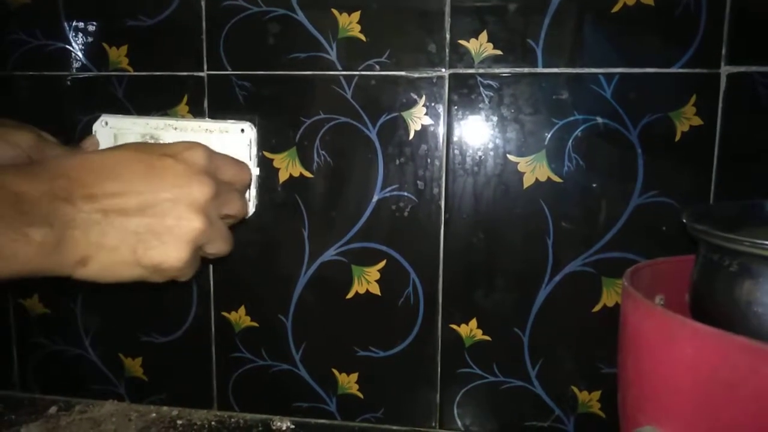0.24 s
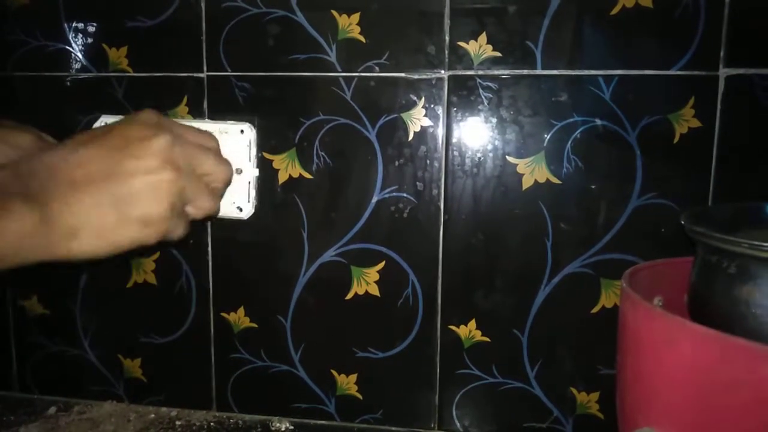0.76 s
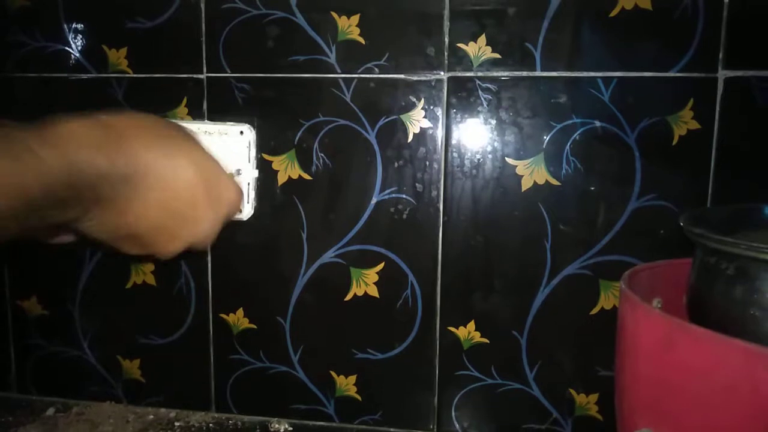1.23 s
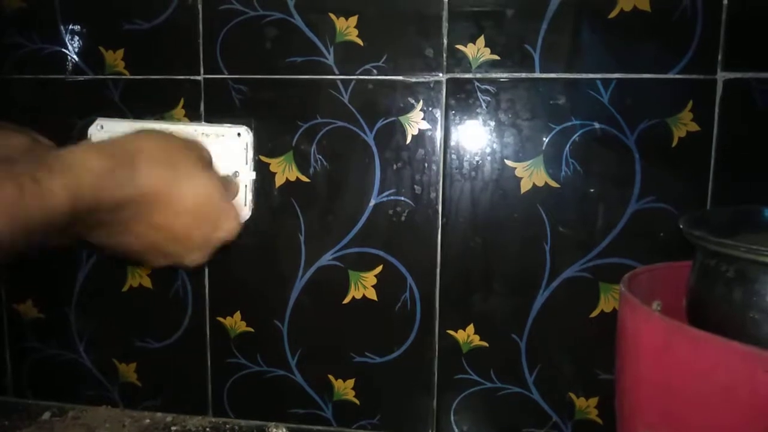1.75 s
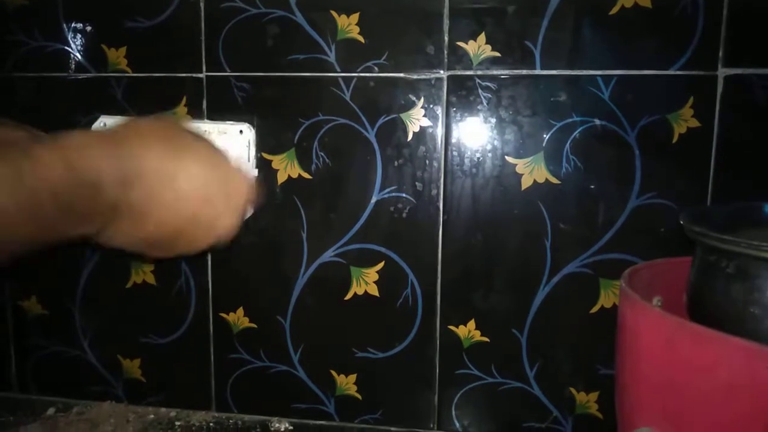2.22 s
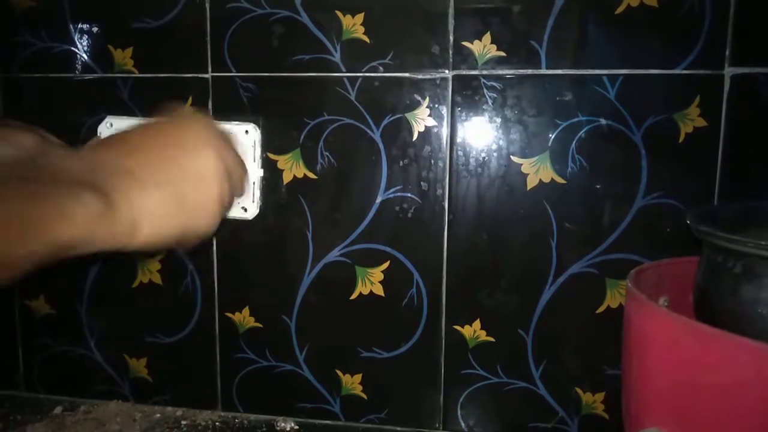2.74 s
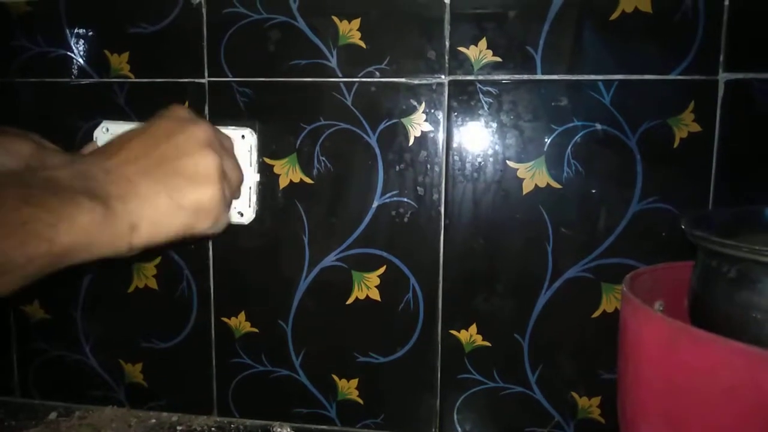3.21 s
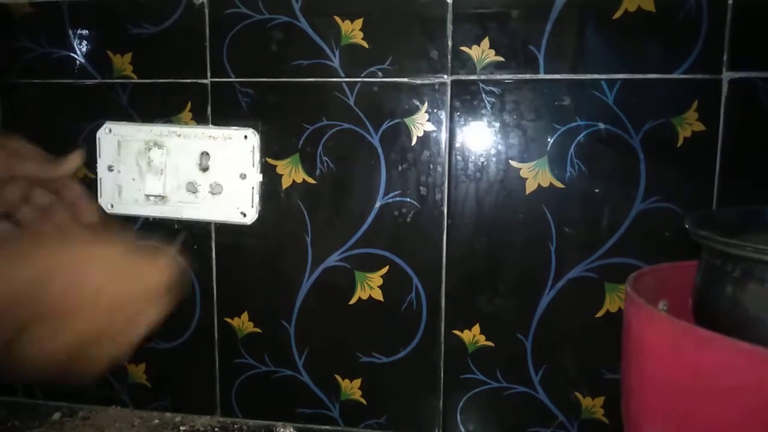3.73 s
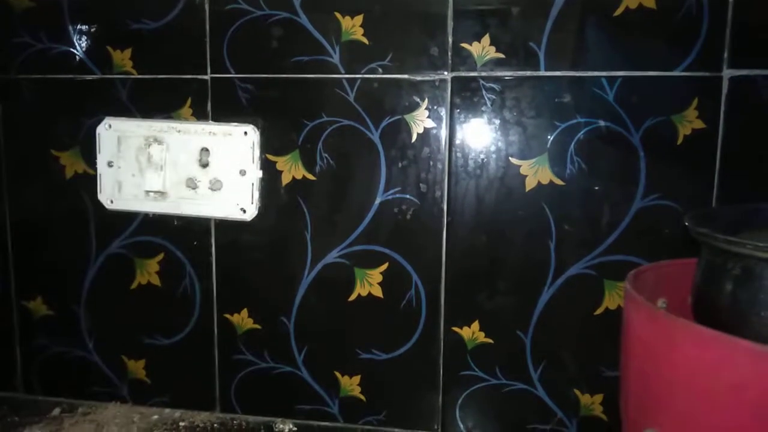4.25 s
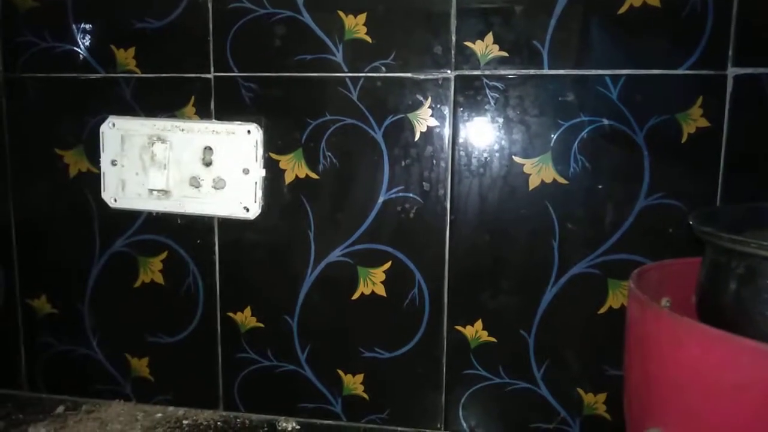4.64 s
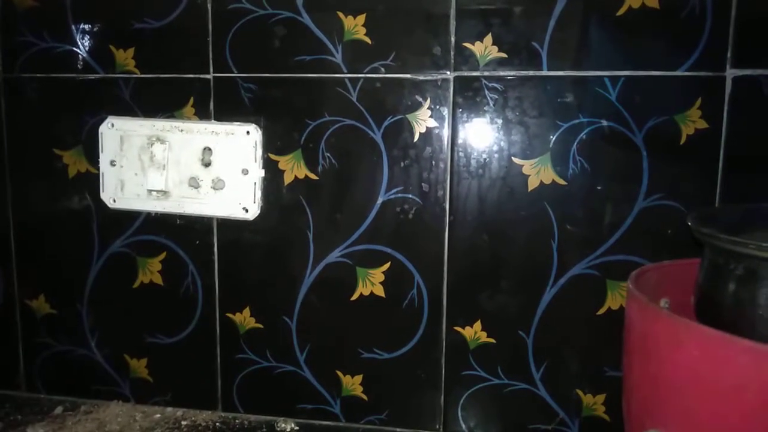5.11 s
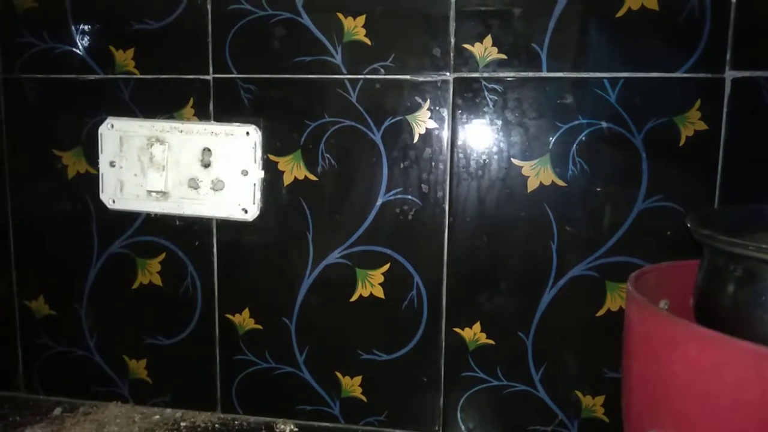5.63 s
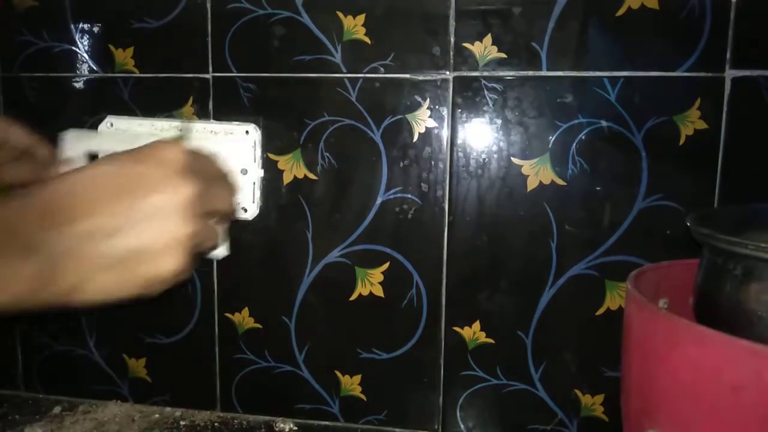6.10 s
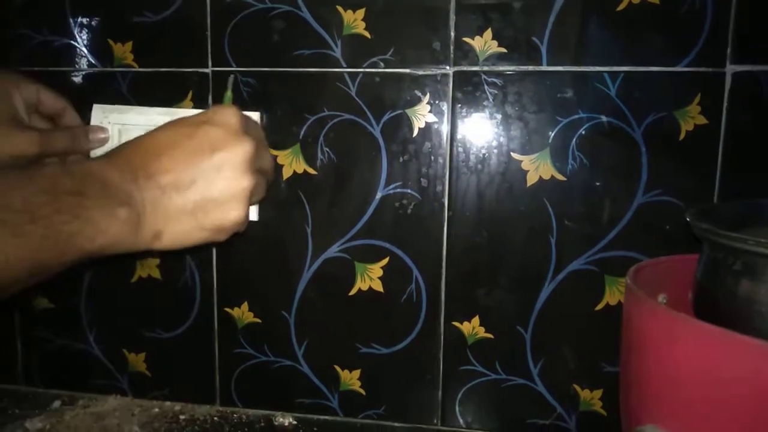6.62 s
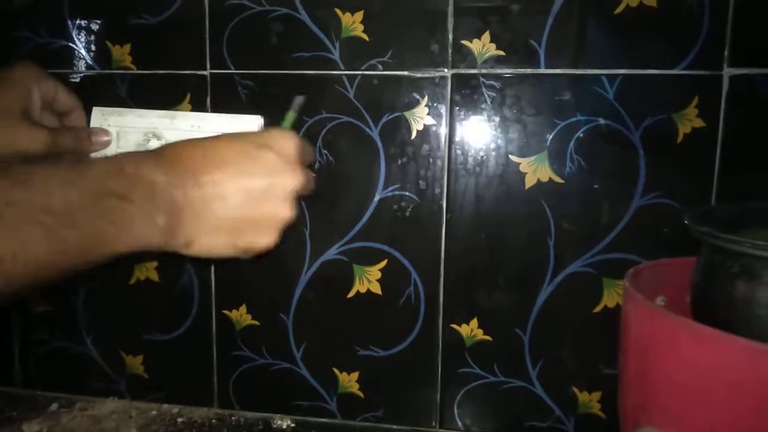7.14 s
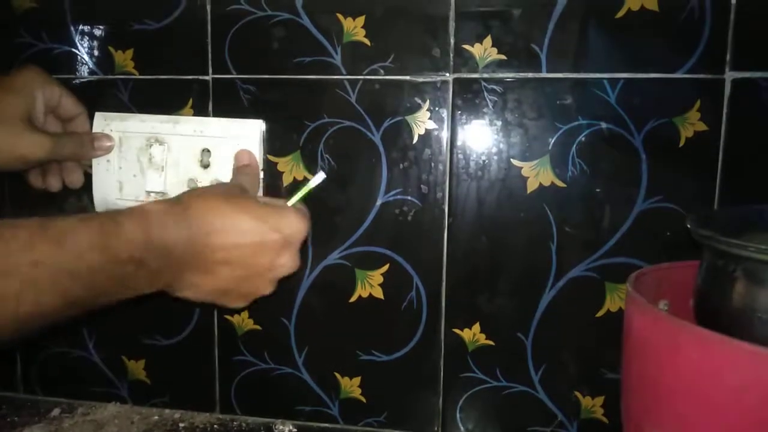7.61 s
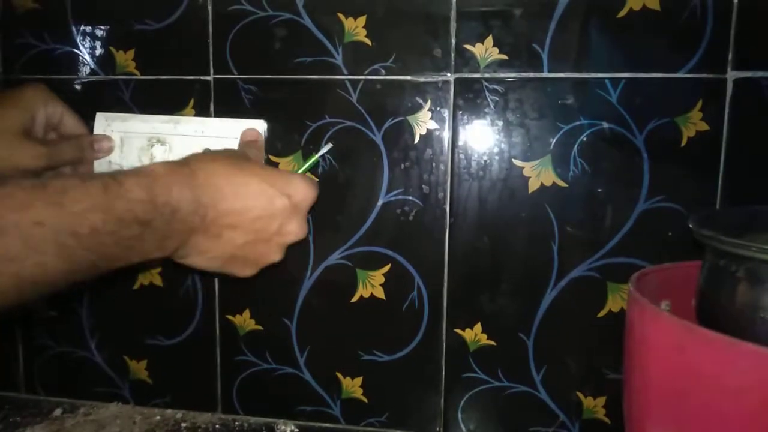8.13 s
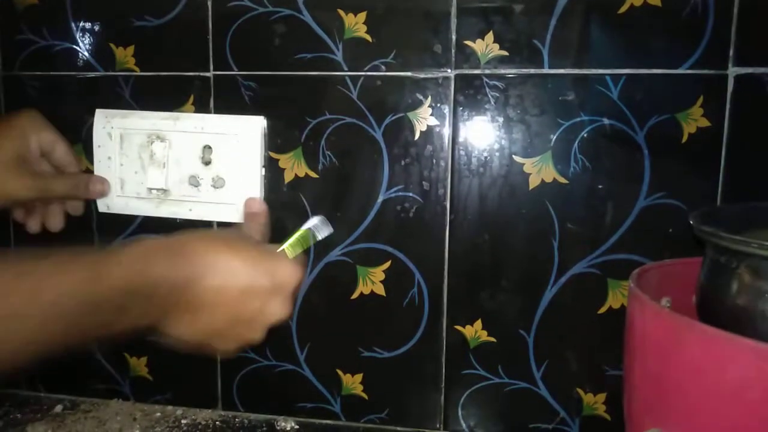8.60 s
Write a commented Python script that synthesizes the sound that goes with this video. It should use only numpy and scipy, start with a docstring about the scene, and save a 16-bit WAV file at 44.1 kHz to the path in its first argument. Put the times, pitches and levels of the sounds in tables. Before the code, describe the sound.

In a quiet tiled kitchen with a faint wavering hum, fingers tick and rub on plastic and click a wall switch on and off, close by. A light clink and two hard knocks come from things on the counter. A loose plastic cover then rattles softly, seats with a loud snap and gives several smaller snaps as its catches lock, while a faint deep rumble rises near the end.

```python
"""A tiled kitchen, hands at work on a plastic wall switch. The rocker flips with a dull crack over its
hollow box, fingers tick and rub, things knock on the counter, then the cover plate is pressed on and
snaps into place. Each click is a burst of short, crowded modes, brighter for a harder contact, and the
tiles throw it back. Underneath lie still air, a wavering hum and, near the end, a deep rumble."""
import sys
import numpy as np
from scipy import signal
from scipy.fft import rfft, irfft
from scipy.io import wavfile
from scipy.ndimage import uniform_filter1d

SR = 44100
rng = np.random.default_rng(int(sys.argv[2]) if len(sys.argv) > 2 else 0)


def generate_wav(sig):
    """Save sig (samples, or channels by samples) to the path in sys.argv[1] as 16-bit PCM at SR."""
    pcm = np.round(np.clip(np.atleast_2d(sig).T, -1, 1) * 32767).astype(np.int16)
    wavfile.write(sys.argv[1], SR, pcm)


N = 390725


def amp(db):
    """Decibels to gain."""
    return 10 ** (np.asarray(db) / 20)


def unit_rms(x):
    """Scales to rms 1."""
    return x / np.sqrt(np.mean(x ** 2) + 1e-20)


def curve(points, hz):
    """Reads (f/Hz, value) points on a log-frequency axis."""
    f, value = np.transpose(points)
    return np.interp(np.log(hz + 1), np.log(f + 1), value)


def peaks(resonances, hz):
    """Gain in dB of resonances given as (f/Hz, width/Hz, gain/dB)."""
    return sum(db / (1 + (2 * (hz - f) / width) ** 2) for f, width, db in resonances)


def add(mix, s, sound):
    """Mixes a sound in at s seconds."""
    part = mix[..., round(s * SR):][..., :sound.shape[-1]]
    part += sound[..., :part.shape[-1]]


def eq(x, points):
    """Filters by a curve of (f/Hz, gain/dB)."""
    return irfft(rfft(x) * amp(curve(points, np.fft.rfftfreq(len(x), 1 / SR))), len(x))


def minimum_phase(db):
    """The filter with this gain that rings only after the blow."""
    log_gain = np.log(amp(np.concatenate([db, db[-2:0:-1]])))
    return np.exp(np.conj(signal.hilbert(log_gain)))[:len(db)]


def drift(rate_hz):
    """Smooth random modulation of rms 1."""
    lowpass = np.exp(-(np.fft.rfftfreq(N, 1 / SR) / rate_hz) ** 2)
    return unit_rms(irfft(rfft(rng.standard_normal(N)) * lowpass, N))


# Room tone EQ: f/Hz, gain/dB
AIR_EQ = [(12, -30), (20, 8.5), (65, -13.5), (88, -2), (113, -8.5), (146, -14.5), (163, -24.5), (177, -23),
          (262, -27.5), (301, -18), (446, -31), (624, -27), (1060, -30.5), (1150, -31), (1480, -30.5),
          (2140, -32), (2670, -35), (2910, -37.5), (16000, -39)]
def air(level_db=-60.5):
    """Still air: a steady bed of dark noise."""
    return amp(level_db) * unit_rms(eq(rng.standard_normal(N), AIR_EQ))


# Swells of the hum: t/s, lift/dB
HUM_SWELLS = [(.41, 3), (.77, 8.5), (1.49, 9), (2.21, 3), (2.93, 7), (3.29, 11), (3.65, 7.5), (4.73, 11.5),
              (6.17, 4), (8.33, 6)]
def hum(pitch_hz=143.3, level_db=-68, waver_hz=3.5, flutter=0.56, swell_s=0.076):
    """A low sine that wavers in pitch, flutters and swells now and then."""
    t = np.arange(N) / SR
    cycles = np.cumsum(pitch_hz + waver_hz * drift(7.46)) / SR
    swell_db = sum(db * np.exp(-((t - s) / swell_s) ** 2) for s, db in HUM_SWELLS)
    level = amp(level_db + swell_db) * (1 + flutter * drift(19))
    return level * unit_rms(np.sin(2 * np.pi * cycles))


# Fader ride of the rumble: t/s, level/dB
RUMBLE_RIDE = [(0, -70.5), (7.401, -75), (7.9, -56.5), (8.86, -57.5)]
def rumble():
    """Sub-bass noise that grows near the end."""
    low = eq(rng.standard_normal(N), [(15, -29), (35, 9.5), (52, 0), (90, -26), (300, -67.5)])
    return unit_rms(low) * amp(np.interp(np.arange(N) / SR, *np.transpose(RUMBLE_RIDE)))


# Reverb decay: f/Hz, t60/s
TILE_DECAY = [(150, 0.25), (600, 0.66), (1500, 0.52), (3500, 0.57), (6500, 0.57), (15000, 0.29)]
# Reverb EQ: f/Hz, gain/dB
TILE_EQ = [(150, 7.5), (700, 8), (1400, 3.5), (3000, 1), (6300, -4.5), (10000, -2), (15000, 3.5)]
def tile_reverb(send, build_s=0.0039):
    """Dense reflections build up, then each band dies at its own speed."""
    hz, t, bands = signal.stft(rng.standard_normal(SR), SR, nperseg=256)
    decay = amp(-60 * t / curve(TILE_DECAY, hz)[:, None])
    tail = signal.istft(bands * decay * (1 - np.exp(-t / build_s)), SR, nperseg=256)[1]
    return signal.fftconvolve(send, eq(tail / np.linalg.norm(tail), TILE_EQ))[:N]


# Fingers sliding over plastic: t/s, length/s, level/dB
STROKES = [(0.311, 0.011, -60), (0.652, 0.0035, -41), (1.102, 0.12, -64), (1.312, 0.033, -66),
           (1.543, 0.14, -60), (1.994, 0.13, -61.5), (2.445, 0.1, -59.5), (2.857, 0.12, -60),
           (3.257, 0.12, -68.5), (3.545, 0.024, -58.5), (4.188, 0.021, -49.5), (4.209, .1, -59.5),
           (5.152, 0.065, -62.5), (5.207, 0.078, -64), (5.587, 0.091, -57.5), (6.5, 0.1, -66),
           (6.879, 0.014, -45), (7.418, 0.0073, -49), (8.55, 0.021, -50)]
# Friction EQ: f/Hz, gain/dB
RUB_EQ = [(180, -32), (300, -19.5), (398, -6), (565, -10.5), (1190, -22.5), (1340, -7), (1780, -8.5),
          (2700, -9.5), (3030, -10.5), (4370, -12.5), (6200, -1), (8360, -20.5), (16000, -11.5)]
# Resonances that rubbing picks out: f/Hz, width/Hz, gain/dB
SQUEAK_MODES = [(2737, 130, 11.5), (6200, 500, 2), (2100, 680, 1.5)]
def finger_rubs(grain_db=3.0, slips_hz=260):
    """Skin sticks and slips: grainy, faintly squeaky hiss under each stroke."""
    hz = np.fft.rfftfreq(N, 1 / SR)
    slips = rng.standard_normal(N) * amp(grain_db * drift(slips_hz))
    pressure = np.zeros(N)
    for s, length, db in STROKES:
        add(pressure, s, amp(db) * np.sqrt(np.hanning(round(length * SR))))
    colour = amp(curve(RUB_EQ, hz) + peaks(SQUEAK_MODES, hz))
    return pressure * unit_rms(irfft(rfft(slips) * colour, N))


def crowded_modes(t, t60, rise_s=0.00074, spike_db=5, spike_t60=0.0053):
    """Spectrum of a hard little body's short modes: a noise burst with a sharp transient on top."""
    envelope = (1 - np.exp(-t / rise_s)) * (amp(-60 * t / t60) + amp(spike_db - 60 * t / spike_t60))
    modes = rfft(envelope * rng.standard_normal(len(t)))
    return modes / np.sqrt(uniform_filter1d(abs(modes) ** 2, size=70))  # the blow feeds all bands evenly


# Centres of a click's thud, mid, bite, snap and fizz bands: f/Hz
CLICK_BANDS = [520, 1400, 3200, 6000, 14000]
# Lift of bite, snap and fizz with hardness: slope/(dB per dB)
HARDNESS_LIFT = [0.42, 0.98, 1.02]
# Colour that the tiled corner and the microphone give every click: f/Hz, gain/dB
CLICK_EQ = [(60, -14.5), (150, -11), (255, -12), (340, -5), (480, -5.5), (590, -7), (760, -4.5), (1400, 0),
            (4200, -4.5), (5300, 0), (6400, 8.5), (7100, 0.5), (7800, -5.5), (11000, -12), (13500, -5.5),
            (15600, 3.5)]
def strike(body, db, thud_db, hard_db, treble_db, contact_hz, t60, send_db, contact_db=8, size=8192):
    """One blow, as (direct, reverb send); hardness lifts treble_db: bite, snap and fizz over the mid."""
    t, hz = np.arange(size) / SR, np.fft.rfftfreq(size, 1 / SR)
    modes = crowded_modes(t, t60)
    bands_db = [thud_db, 0, *(np.array(treble_db) + hard_db * np.array(HARDNESS_LIFT))]
    shape_db = db + curve(list(zip(CLICK_BANDS, bands_db)), hz) + curve(CLICK_EQ, hz)
    contact = [(contact_hz[0], 75, contact_db), (contact_hz[1], 75, 6)]
    ring_db = np.maximum(peaks(body, hz), peaks(contact, hz))
    # each blow wakes some modes more than others
    ring_db += 2 * unit_rms(uniform_filter1d(rng.standard_normal(len(hz)), size=14))
    predelay = np.exp(-2j * np.pi * hz * 0.004)  # 4 ms until the first surface answers
    click = irfft(modes * minimum_phase(shape_db + ring_db))
    pulse = irfft(predelay * minimum_phase(shape_db + ring_db / 2))
    fade = np.minimum(1, 2 - 2 * t / t[-1]) ** 2
    return np.array([click, amp(send_db) * pulse]) * fade


def ring(hz, db, spread_hz, t60, rise_s=0.0047, count=64):
    """A ringing note: a cluster of close modes that beat as they die."""
    t = np.arange(SR * 2 // 3) / SR
    detune, phase = rng.standard_normal((count, 1)), rng.random((count, 1))
    cluster = np.sin(2 * np.pi * ((hz + spread_hz * detune) * t + phase)).sum(0)
    envelope = amp(-60 * t / t60) * (1 - np.exp(-t / rise_s))
    return amp(db) * envelope * cluster / np.sqrt(np.average(cluster ** 2, weights=envelope ** 2))


# Resonances of the things on the counter: f/Hz, width/Hz, gain/dB
WARE_MODES = [(476, 9.2, 9), (940, 57, 5.5), (1044, 58, 2.5), (1603, 65, -5), (2154, 190, 11.5),
              (3270, 29, -7), (5620, 100, 6.5), (6930, 90, -1)]
# Hits on the counter: t/s, level/dB, thud/dB, bite/dB, hardness/dB, contact f/Hz, t60/s, send/dB
COUNTER_HITS = [(4.2015, -13.5, -9, 14, 6, 2430, 0.067, -18), (4.208, -14.5, -5, 15.5, 5, 2450, 0.042, -23),
                (4.46, -39.5, 0, -5, 5.5, 5860, 0.051, 3.5), (5.011, -38.5, -5, 5.5, 6, 2000, 0.037, -17),
                (5.3604, 11.5, -12, -4.5, -9.5, 1840, 0.029, -17),
                (5.376, 1.5, 3, 1.5, -5.5, 2080, 0.062, -14),
                (5.6186, -3.5, -12, -4, 7, 5600, 0.025, -15.5), (5.621, 0.5, 6, -1.5, 7, 5860, 0.044, -11)]
# Ring-out of thin ware: t/s, f/Hz, level/dB
WARE_CLINKS = [(4.205, 2390, -58.5), (5.364, 1926, -47.5)]
# Low end under the heavy hits: t/s, level/dB
COUNTER_BOOMS = [(5.363, -39), (5.623, -41.5)]
def counter(boom_hz=141):
    """Things knock on the counter; thin ware rings on, and the counter booms under the heavy ones."""
    out = np.zeros((2, N))
    for s, db, thud_db, bite_db, hard_db, hz, t60, send_db in COUNTER_HITS:
        add(out, s, strike(WARE_MODES, db, thud_db, hard_db, treble_db=[bite_db, -3.5, -6],
                           contact_hz=[hz, 1620], t60=t60, send_db=send_db))
    for s, hz, db in WARE_CLINKS:
        add(out[0], s, ring(hz, db, spread_hz=210, t60=0.55))
    for s, db in COUNTER_BOOMS:
        add(out[0], s, ring(boom_hz, db, spread_hz=0.86, t60=0.54, rise_s=0.0091))
    return out


# The plate over its hollow box, the body of every switch click: f/Hz, width/Hz, gain/dB
PLATE_MODES = [(331, 54, 4), (449, 39, 8), (784.4, 24, 12.5), (970, 22, 8.5), (1450, 61, 7.5),
               (1602, 51, 5.5), (1974, 33, 8), (2508, 150, 5.5), (2710, 62, 7.5), (4000, 67, 2),
               (4670, 140, 3), (5950, 130, 4), (6040, 200, 1)]
# Finger ticks: t/s, level/dB, hardness/dB, contact f/Hz
FINGER_TICKS = [(1.082, -32, -5, 2770), (1.113, -22, -3, 2770), (1.469, -30, -1, 1590),
                (1.585, -30, -6, 2750), (1.625, -27, -9, 2840), (1.777, -29, -7, 750),
                (1.809, -40, 12.5, 6260), (1.938, -28.5, -3, 1050), (2.348, -36, 2.5, 2220),
                (2.786, -37.5, 4, 1470), (2.8, -23.5, -14, 1370), (3.301, -25, -3, 1420),
                (3.553, -38, 6, 5070), (6.259, -33, 0.5, 1620), (6.8467, -33.5, 6.5, 6400),
                (7.5716, -46, 6, 938), (8.3207, -37, 9, 2730)]
def fingertips(thud_db=-3):
    """Fingertips and nails tick on the plastic, too lightly to wake the box."""
    out = np.zeros((2, N))
    for s, db, hard_db, hz in FINGER_TICKS:
        add(out, s, strike(PLATE_MODES, db, thud_db, hard_db, treble_db=[0.5, -6.5, -3],
                           contact_hz=[hz, 2760], t60=0.066, send_db=-6, contact_db=13))
    return out


# Bumps of the cover: t/s, level/dB, thud/dB, hardness/dB, hollow note level/dB
COVER_BUMPS = [(6.379, -27.5, 14, 4, -66), (6.391, -17, 4.5, 2, -45), (6.424, -22, 1, -4.5, -42.5),
               (6.557, -23, 14, 8.5, -54), (6.562, -17.5, 13.5, -7, -44), (6.638, -16, 16.5, -1.5, -43),
               (6.667, -14, 9.5, 8, -40), (6.6881, -9, 10, -4.5, -37.5), (6.776, -24.5, 3.5, -21, -55),
               (8.037, -25, 16, -11, -74), (8.803, -32.5, 19, -15, -56)]
def cover_pushes(box_hz=760):
    """The loose cover bumps on the box, which answers with a short hollow note."""
    out = np.zeros((2, N))
    for s, db, thud_db, hard_db, note_db in COVER_BUMPS:
        add(out, s, strike(PLATE_MODES, db, thud_db, hard_db, treble_db=[3.5, -4, -9],
                           contact_hz=[770, 1560], t60=0.046, send_db=-15.5))
        add(out[0], s, ring(box_hz, note_db, spread_hz=42, t60=0.1, rise_s=0.0064))
    return out


def cover_seating(meet_s=6.885, seat_s=6.911, thump_hz=36, thump_db=-33, thump_t60=0.11):
    """The cover knocks against the wall, then drops home with one heavy, quickly damped swing."""
    out, t = np.zeros(N), np.arange(SR // 2) / SR
    add(out, meet_s, ring(hz=390, db=-34, spread_hz=160, t60=0.04, rise_s=0.003))
    add(out, seat_s, amp(thump_db - 60 * t / thump_t60) * np.sin(2 * np.pi * thump_hz * t))
    return out


# Flips: t/s, level/dB, thud/dB, hardness/dB, hollow note f/Hz, hollow note level/dB
ROCKER_FLIPS = [(0.3201, -11, -37, 0, 1317, -64), (0.4244, -17, -10, -3, 1373, -70),
                (0.6548, 0, -14.5, 8.5, 1488, -54.5), (1.8312, -10.5, 6, 13.5, 1115, -60),
                (2.3917, -0.5, -4.5, -8, 1320, -48.5), (3.443, -2.5, -3.5, -0.5, 1385, -58),
                (3.466, -7, -11, -6.5, 1388, -59), (3.483, -9.5, -17, -3, 1480, -67)]
def rocker(box_db=-47, box_hz=715):
    """Each flip is a dull crack; the box rings with a hollow note and a lower one tracking its level."""
    out = np.zeros((2, N))
    for s, db, thud_db, hard_db, hollow_hz, hollow_db in ROCKER_FLIPS:
        add(out, s, strike(PLATE_MODES, db, thud_db, hard_db, treble_db=[-7, -17.5, -15.5],
                           contact_hz=[1630, 2850], t60=0.059, send_db=-17, contact_db=10))
        add(out[0], s, ring(hollow_hz, hollow_db, spread_hz=175, t60=0.57))
        add(out[0], s, ring(box_hz, db + box_db, spread_hz=43.2, t60=0.18))
    return out


# Snaps of the catches: t/s, level/dB, thud/dB, bite/dB, hardness/dB, hand pressure/(0-1)
CATCH_SNAPS = [(6.8877, 0.5, 9, -7, -6, 1), (6.893, 12, -10, -5, -7, 1), (6.909, 2, -8.5, 0.5, 1.5, 0),
               (7.1251, -3, 3, 8, 6.5, 0), (7.4254, -11.5, -1, 2, -3.5, 1),
               (7.4302, -7.5, 5.5, 6, -7, 0.38), (7.6039, -13, 2.5, 5.5, 8.5, 0.24),
               (7.86, -21, 7.5, 3, -3, .3), (7.865, -7.5, 3, 1, -5, 0.3), (8.562, -9, 6.5, 17, -11.5, 0.74),
               (8.5672, -8.5, 0.5, 5.5, 1.5, 0)]
def cover_catches(free_t60=0.049, damping=0.49, send_db=-14, shield_db=-7, box_db=-47, box_hz=690):
    """Catches snap home brightly; a hand on the cover chokes the ring and shields it from the room."""
    out = np.zeros((2, N))
    for s, db, thud_db, bite_db, hard_db, held in CATCH_SNAPS:
        t60 = free_t60 * (1 - damping * held)
        add(out, s, strike(PLATE_MODES, db, thud_db, hard_db, treble_db=[bite_db, 0.5, -4.5],
                           contact_hz=[4950, 6800], t60=t60, send_db=send_db + shield_db * held))
        add(out[0], s, (1 - held) * ring(box_hz, db + box_db, spread_hz=14, t60=0.36))
    return out


def scene(rub_send_db=-10):
    """Mono mix: the handling and its reverb over the background bed."""
    clicks, send = rocker() + fingertips() + cover_pushes() + cover_catches() + counter()
    rubs = finger_rubs()
    direct = clicks + rubs + cover_seating()
    reverb = tile_reverb(send + amp(rub_send_db) * rubs)
    return (direct + reverb + air() + hum() + rumble())[None]


def record(dry, low_cut_hz=36, high_cut_hz=16000):
    """Master EQ: a gentle low cut and a steep high cut."""
    thinned = signal.sosfilt(signal.butter(2, low_cut_hz, "highpass", fs=SR, output="sos"), dry)
    lowpass = signal.firwin(511, high_cut_hz, window=("kaiser", 9), fs=SR)
    return signal.oaconvolve(thinned, lowpass[None], "same")


dry = scene()
out = record(dry)
generate_wav(out)
```